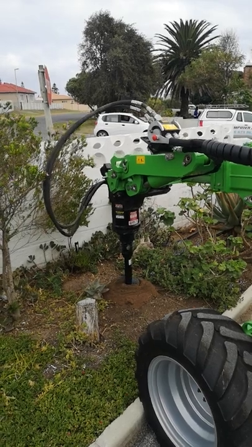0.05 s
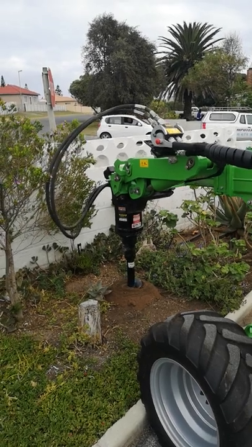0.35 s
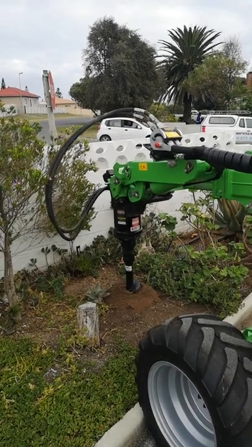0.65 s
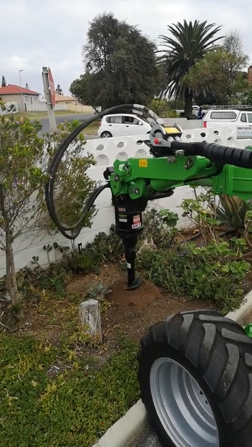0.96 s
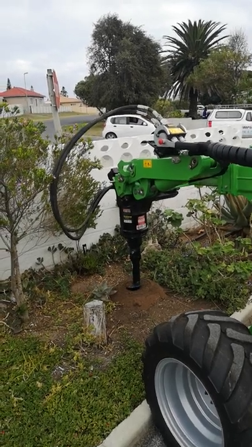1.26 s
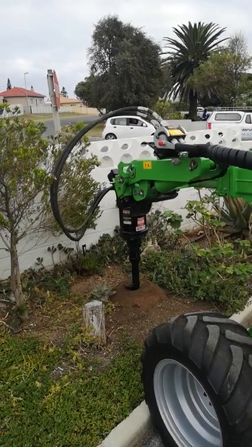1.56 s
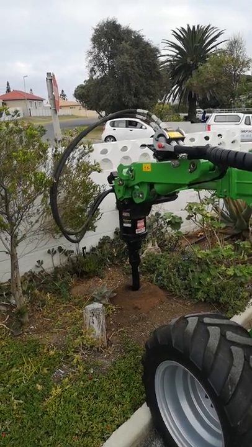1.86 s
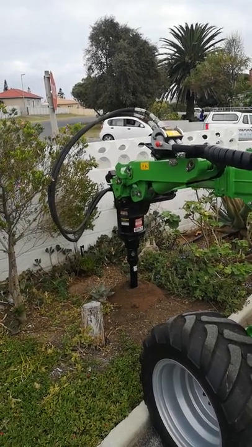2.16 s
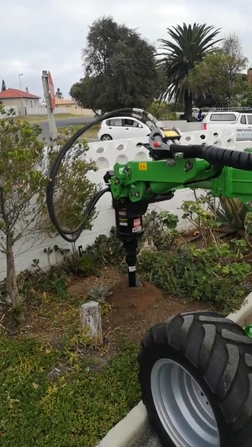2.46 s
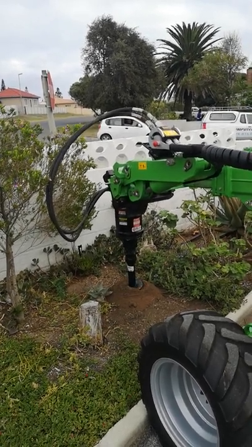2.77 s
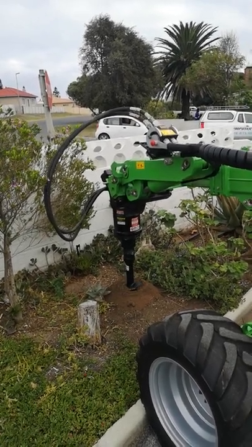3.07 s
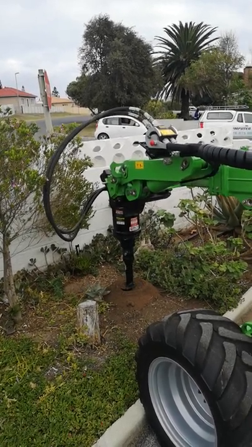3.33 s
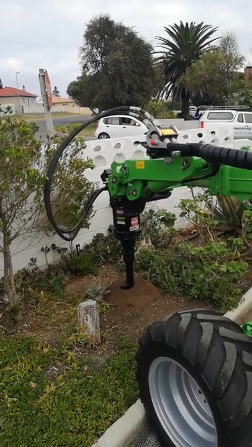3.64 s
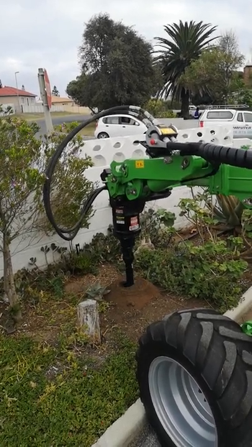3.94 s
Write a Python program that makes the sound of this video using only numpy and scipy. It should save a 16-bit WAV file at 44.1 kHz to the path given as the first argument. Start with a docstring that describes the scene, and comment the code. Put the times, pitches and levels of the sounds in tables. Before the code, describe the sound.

A small diesel loader drones and clatters at steady revs throughout, slightly muffled at first and clearing by 1.5 seconds. Short gritty soil scrapes come in the first second, with faint hydraulic whine and hiss to the right. From about 1 second the auger drive gives light, irregular metallic knocks, and the exhaust hardens under load, easing around 3 seconds. One tiny sharp crack comes at about 1.5 seconds.

```python
"""A small loader drilling into soil

A two-cylinder diesel runs at steady revs in a yard while its hydraulic auger turns in the ground.
The exhaust drones and hardens under load, a fan hums, and valves and injectors clatter.
The pump whines, oil hisses through its valves, soil scrapes, and slack in the auger's drive knocks.
The right side faces the machine; it starts muffled and opens up over the first second and a half."""
import sys
import numpy as np
from scipy import signal
from scipy.fft import rfft, irfft
from scipy.io import wavfile

SR = 44100
rng = np.random.default_rng(int(sys.argv[2]) if len(sys.argv) > 2 else 0)


def master_out(mix):
    """Clip the mix to full scale and print it as 16-bit PCM to the path in sys.argv[1]."""
    frames = np.transpose(np.atleast_2d(mix))
    ceiling = np.clip(frames, -1, 1)
    pcm = np.round(ceiling * 32767).astype(np.int16)
    wavfile.write(sys.argv[1], SR, pcm)


N = 176400
TIME = np.arange(N) / SR
BINS_HZ = np.maximum(np.fft.rfftfreq(N, 1 / SR), 1)

# Engine speed, with one firing per turn. Each row: time in seconds, turns per second.
ENGINE_SPEED = [(0.0, 35.5), (0.35, 35.69), (1.25, 35.68), (2.1, 35.94), (2.55, 36.11), (2.85, 36.01),
                (3.1, 35.57), (3.4, 35.4), (3.7, 36.39), (4.0, 36.3)]
# The muffled sound clears in three pitch ranges. Each pair: start and end in seconds.
OPEN_LOW_S, OPEN_MID_S, OPEN_TOP_S = (0.61, 0.68), (0.79, 0.9), (0.57, 1.53)


def from_db(db):
    """Turn decibels into a gain."""
    return 10 ** (np.asarray(db) / 20)


def unit_level(x):
    """Scale a signal so that its average level (rms) is 1."""
    return x / np.sqrt(np.mean(x ** 2) + 1e-20)


def in_time(rows):
    """Join rows of time and value into a curve with a value at every sample."""
    return np.interp(TIME, *np.transpose(rows))


def over_hz(rows, column=1):
    """Spread one column of a table over every frequency."""
    rows = np.array(rows)
    return np.interp(np.log(BINS_HZ), np.log(rows[:, 0]), rows[:, column])


def below(hz):
    """The share of power that a soft split at hz gives to the low side, at every frequency."""
    return 1 / (1 + (BINS_HZ / hz) ** 6)


def shaped(x, gain):
    """Filter a signal with one gain per frequency."""
    return irfft(rfft(x) * gain, N)


def coloured(white, rows, column=1):
    """Give white noise of level 1 the spectrum in a table, in dB per Hz."""
    return shaped(white, from_db(over_hz(rows, column)) * np.sqrt(SR / 2))


def drift(rate_hz):
    """A random wobble of level 1, mostly slower than rate_hz."""
    return unit_level(shaped(rng.standard_normal(N), 1 / (1 + (BINS_HZ / rate_hz) ** 2)))


def resonate(x, hz, width_hz):
    """A resonance: sound at hz passes fully, and the rest is weakened."""
    r = np.exp(-np.pi * width_hz / SR)
    feedback = [1, -2 * r * np.cos(2 * np.pi * hz / SR), r * r]
    return signal.lfilter(np.array([1, 0, -1]) * (1 - r * r) / 2, feedback, x)


def narrow_noise(hz, width_hz):
    """Noise of level 1 gathered around one pitch."""
    return unit_level(resonate(resonate(rng.standard_normal(N), hz, width_hz), hz, width_hz))


def wavering_tone(turns, per_turn, width_hz):
    """An unsteady tone of level 1 whose pitch follows the engine."""
    angle = 2 * np.pi * per_turn * turns
    return drift(width_hz) * np.cos(angle) + drift(width_hz) * np.sin(angle)


def on_right(x, left_db):
    """Place a sound to the right by turning its left side down."""
    return np.array([from_db(left_db) * x, x])


def blend_sides(pair):
    """Make the left and right sides partly alike, most of all in the bass."""
    # Each row: frequency in Hz, likeness of the sides from 0 (unrelated) to 1 (the same).
    likeness = [(110, 0.79), (220, 0.93), (370, 0.17), (690, 0.037), (1200, 0.58), (2300, 0.31),
                (4300, 0.026)]
    alike = over_hz(likeness)
    left, right = pair
    return np.array([shaped(right, alike) + shaped(left, np.sqrt(1 - alike ** 2)), right])


def strikes(turns, at_turn, level_db, scatter_db, jitter_s=.00004):
    """One click in each engine cycle of two turns, a little uneven in time and strength."""
    when = np.interp(np.arange(at_turn, turns[-1], 2), turns, TIME)
    chance = rng.standard_normal((SR, 2))[:len(when)]
    index = ((when + jitter_s * chance[:, 0]) * SR).astype(int)
    heard = (when > 0) & (index >= 0) & (index < N)
    clicks = np.zeros(N)
    clicks[index[heard]] = from_db(level_db + scatter_db * chance[heard, 1])
    return clicks


def bursts(clicks, decay_s):
    """A loudness curve that jumps at each click and then dies away."""
    power = signal.lfilter([1], [1, -np.exp(-2 / (decay_s * SR))], clicks ** 2 + 1e-18)
    return unit_level(np.sqrt(power))


def exhaust(turns):
    """Firings make a deep throb, pipe tones that grow with load, and a pulsing rush of gas."""
    # How hard the engine works. Each row: time in seconds, change in the pipe's ring in dB.
    load = [(0, -15), (.3, -15), (.7, -8), (1.05, -2), (1.4, -2.5), (1.8, -1.5), (2.4, 1.5), (2.9, 1),
            (3.15, -8.5), (3.4, -8.5), (3.7, -6.5), (4, -5)]
    # The growl of the pipe's upper tones. Each row: time in seconds, change in dB.
    growl = [(0, -7.5), (.6, -4.5), (1.2, -3), (1.55, 1), (2, -1), (2.55, 1), (2.9, -1), (3.2, -7.5),
             (3.5, -6.5), (4, -5)]
    # The deep throb. Each row: multiple of the firing rate, level in dB.
    throb_tones = [(1, -24), (2, -19.5)]
    # The pipe. Each row: multiple of the firing rate, base level in dB, share of load or growl added.
    pipe_tones = [(3, -65, 0), (5, -40.5, 0.42), (6, -29, 0.97), (7, -50, 0.97), (8, -40.5, 0.75),
                  (9, -38.5, 1.35), (10, -44, 1.7), (11, -48.5, 1.5), (12, -43.5, 0.76), (13, -50.5, 1.4),
                  (15, -57.5, 0.57), (18, -51, 0.51)]
    # The rushing gas. Each row: frequency in Hz, base level in dB per Hz.
    rush_spectrum = [(15, -75), (45, -58), (80, -58.5), (100, -58.5), (135, -56.5), (165, -64.5),
                     (215, -57), (255, -62), (310, -65.5), (420, -72), (600, -102.5), (1200, -110)]
    left_lag_s, pipe_lag_turns, ring_multiple, smear_rad = .0005, .76, 6, -0.2998
    load_db, growl_db = in_time(load), in_time(growl)
    heard_turns = turns - np.array([[left_lag_s], [0]]) * in_time(ENGINE_SPEED)
    throb = sum(from_db(db) * np.cos(2 * np.pi * multiple * heard_turns) for multiple, db in throb_tones)
    angle = 2 * np.pi * (heard_turns - pipe_lag_turns)
    pipe = 0
    for multiple, db, share in pipe_tones:
        swing_db = share * (load_db if multiple <= ring_multiple else growl_db)
        waver_db = drift(rate_hz=1.5)
        smear = smear_rad * (multiple - ring_multiple) ** 2  # tones far from the ring arrive out of step
        pipe += from_db(db + swing_db + waver_db) * np.cos(multiple * angle + smear)
    gas = blend_sides(rng.standard_normal((2, N))) * (1 + 0.32 * np.cos(angle))
    rush = coloured(gas, rush_spectrum) * from_db(0.18 * load_db)
    return np.sqrt(2) * (throb + pipe) + rush


def fan(turns):
    """The cooling fan's blades hum among the exhaust's tones."""
    return from_db(-42) * wavering_tone(turns, per_turn=7.25, width_hz=2)


def knocks(turns):
    """Moving parts strike the engine block, which rings and shakes loose parts, over a wash of fan air."""
    # The strikes in one cycle of two turns. Each row: position in turns, relative level in dB.
    contacts = [(.1, -9), (0.408, 0.5), (.55, 2), (0.852, 1), (1.13, -5), (1.46, -3.5), (1.56, 1),
                (1.81, -0.5)]
    ring_db, rattle_db, wash_db, decay_s = -4.5, -7.5, -3, 0.0068
    trains = [strikes(turns, turn, db, scatter_db=1.0) for turn, db in contacts]
    dying = np.exp(-TIME[:SR // 20] / decay_s)
    rings = 0
    for clicks in trains:
        ring = rng.standard_normal((2, len(dying))) * dying  # each contact rings in its own way
        rings += signal.fftconvolve(clicks[None], ring, axes=1)[:, :N]
    shaking = bursts(sum(trains), decay_s)
    rattle_and_wash = np.hypot(from_db(rattle_db) * shaking, from_db(wash_db)) * rng.standard_normal((2, N))
    return from_db(ring_db) * unit_level(rings) + rattle_and_wash


def injectors(turns):
    """The fuel injectors give a strong and a weak tick at every firing, over an even hiss."""
    # The ticks in one cycle of two turns. Each row: position in turns, relative level in dB.
    ticks = [(.45, -1), (.6, -6), (1.45, 0), (1.6, -6)]
    tick_db, hiss_db = -5, -2.5
    clicks = sum(strikes(turns, turn, db, scatter_db=1.4) for turn, db in ticks)
    loudness = np.hypot(from_db(tick_db) * bursts(clicks, decay_s=0.0033), from_db(hiss_db))
    return loudness * rng.standard_normal((2, N))


def clatter(knocking, ticking):
    """Knocks fill the middle and ticks the treble; the right side goes from muffled to clear."""
    # The clatter's tone. Each row: frequency in Hz, then left, clear right, muffled right in dB per Hz.
    spectrum = [(200, -96, -85, -62.5), (390, -66.5, -65.5, -68.5), (537, -80, -71.5, -72),
                (758, -77, -69.5, -70.5), (880, -69, -63.5, -66), (1070, -72, -64, -68),
                (1555, -69.5, -64.5, -74), (1807, -67, -59.5, -68.5), (2404, -73.5, -68, -75),
                (2525, -68, -63, -76.5), (3410, -80, -78, -82), (3860, -80, -76.5, -85),
                (4260, -84, -85.5, -83.5), (5650, -84.5, -86.5, -86), (6350, -92, -86, -89.5),
                (7360, -95, -82, -79), (8300, -101, -91.5, -80.5), (8940, -101, -81, -85.5),
                (10670, -106, -80, -91.5), (12640, -108, -85.5, -97), (14900, -108, -105, -103)]
    knock_share = below(hz=7200)
    mixed = shaped(knocking, np.sqrt(knock_share)) + shaped(ticking, np.sqrt(1 - knock_share))
    left, right = blend_sides(mixed)
    muffled = coloured(right, spectrum, column=3)
    clearing = coloured(right, spectrum, column=2) - muffled
    low, low_and_mid = below(hz=1560), below(hz=2700)
    ranges = [(OPEN_LOW_S, low), (OPEN_MID_S, low_and_mid - low), (OPEN_TOP_S, 1 - low_and_mid)]
    opened = sum(np.interp(TIME, span, [0, 1]) * shaped(clearing, share) for span, share in ranges)
    return np.array([coloured(left, spectrum, column=1), muffled + opened])


def hydraulics(turns):
    """The pump whines with the engine; oil hisses and whistles through the valves, fluttering."""
    # The oil's hiss. Each row: time in seconds, level in dB before the flutter.
    hiss_levels = [(0, -55), (.16, -42.5), (.24, -62), (.46, -60), (.51, -47), (.57, -57), (.63, -48),
                   (.72, -60), (.84, -46), (.95, -45.5), (1.02, -51), (1.25, -47.5), (1.55, -54.5),
                   (1.75, -54.5), (2.9, -55.5), (3.2, -53), (3.31, -50), (3.45, -53), (4, -63)]
    # The oil's thin whistle. Each row: time in seconds, relative level in dB.
    whistle_levels = [(0, -55), (.6, -53), (.93, -52), (1.06, -44), (1.2, -45), (1.4, -51.5), (1.8, -59),
                      (4, -72)]
    whistle_hz = 9070
    main_tone = wavering_tone(turns, per_turn=30.4, width_hz=7.7)
    low_tone = from_db(-5.5) * wavering_tone(turns, per_turn=26.2, width_hz=7.7)
    whine_db = np.interp(TIME, OPEN_LOW_S, [-49, -44.5])  # quieter while muffled
    whine = from_db(whine_db) * (main_tone + low_tone)
    flutter_db = 3 * drift(rate_hz=11)
    hiss = from_db(in_time(hiss_levels) + flutter_db) * narrow_noise(hz=5810, width_hz=440)
    jet = narrow_noise(whistle_hz, width_hz=110)
    spray = from_db(-0.5) * narrow_noise(whistle_hz, width_hz=1000)
    whistle = from_db(in_time(whistle_levels) + flutter_db / 2) * (jet + spray)
    return on_right(whine, left_db=-6.5) + on_right(hiss, left_db=-20) + on_right(whistle, left_db=-40)


def soil():
    """Soil rubs on the auger in short, grainy scrapes as it bites."""
    # Each row: middle of the scrape in seconds, level in dB.
    scrapes = [(.08, -47), (.31, -47), (.43, -56), (.55, -49), (.63, -48), (.74, -43)]
    spread_s, grain_db = .028, -2
    strokes = sum(from_db(db) * np.exp(-.5 * ((TIME - s) / spread_s) ** 2) for s, db in scrapes)
    grit = from_db(grain_db * drift(rate_hz=300)) * narrow_noise(hz=7900, width_hz=2700)
    return on_right(strokes * unit_level(grit), left_db=-19)


def auger_drive(knocking):
    """The drive's housing sings along with the engine and is struck whenever slack is taken up."""
    # The housing's resonances. Each row: pitch in Hz, width in Hz, relative level in dB.
    housing = [(1676, 34, 4.5), (1848, 115, 4.5), (2024, 21, 4.5)]
    # The knocks of the slack. Each row: start in seconds, relative level in dB.
    clunks = [(0.8984, -26), (0.9233, -25), (1.0116, -25.5), (1.0969, -29), (1.269, -28), (1.2885, -24.5),
              (1.3473, -25.5), (1.4586, -23), (1.6057, -23), (1.6571, -28), (1.6846, -21.5), (1.8746, -35),
              (1.9929, -32), (2.0433, -24), (2.2463, -25), (2.3511, -29.5), (2.4578, -31), (2.6853, -26.5),
              (2.795, -29), (2.8295, -23), (2.9322, -24), (3.0185, -27), (3.0824, -28), (3.2779, -27),
              (3.3563, -21), (3.5798, -21.5), (3.8003, -27.5), (3.9115, -39), (3.9444, -25)]
    singing_db, clunk_db, scatter_db = -39, -6, 1.5
    ring_s = 0.071  # time to fade by 60 dB
    singing = sum(from_db(db) * unit_level(resonate(resonate(knocking[0], hz, width), hz, 2 * width))
                  for hz, width, db in housing)
    sound = from_db(singing_db) * unit_level(singing) * np.interp(TIME, OPEN_MID_S, [0, 1])
    starts_s, levels_db = np.transpose(clunks)
    age = TIME[:SR // 5]
    dying = np.exp(-np.log(1000) * age / ring_s)
    chances = rng.standard_normal((len(clunks), len(housing))).T
    for (hz, _, db), chance in zip(housing, chances):
        clicks = np.zeros(N)
        clicks[(starts_s * SR).astype(int)] = from_db(levels_db + clunk_db + db + scatter_db * chance)
        ring = np.sin(2 * np.pi * hz * age + rng.uniform(0, 2 * np.pi)) * dying
        sound += resonate(signal.fftconvolve(clicks, ring)[:N], hz, width_hz=hz / 10)
    return on_right(sound, left_db=-19)


def snap():
    """One bright, very short crack, like grit at the auger."""
    start_s, decay_s, band_hz = 1.5405, .0007, [6200, 12100]
    burst = (TIME >= start_s) * np.exp(-np.abs(TIME - start_s) / decay_s) * rng.standard_normal(N)
    band = signal.butter(3, band_hz, "band", fs=SR, output="sos")
    return on_right(from_db(-13) * signal.sosfilt(band, burst + 1e-18), left_db=-21)


def scene():
    """Add up all the sounds; the count of crankshaft turns keeps engine, fan and pump in step."""
    turns = .515 + np.cumsum(in_time(ENGINE_SPEED)) / SR
    knocking = knocks(turns)
    engine = exhaust(turns) + fan(turns) + clatter(knocking, injectors(turns))
    return engine + auger_drive(knocking) + hydraulics(turns) + soil() + snap()


def record(dry):
    """Cut the highest treble away steeply."""
    cutoff_hz = 15200
    return signal.sosfilt(signal.ellip(10, .1, 80, cutoff_hz, fs=SR, output="sos"), dry)


dry = scene()
out = record(dry)
master_out(out)
```